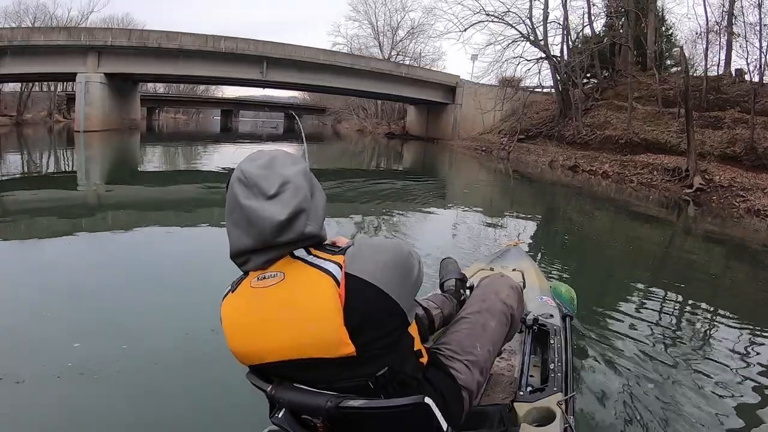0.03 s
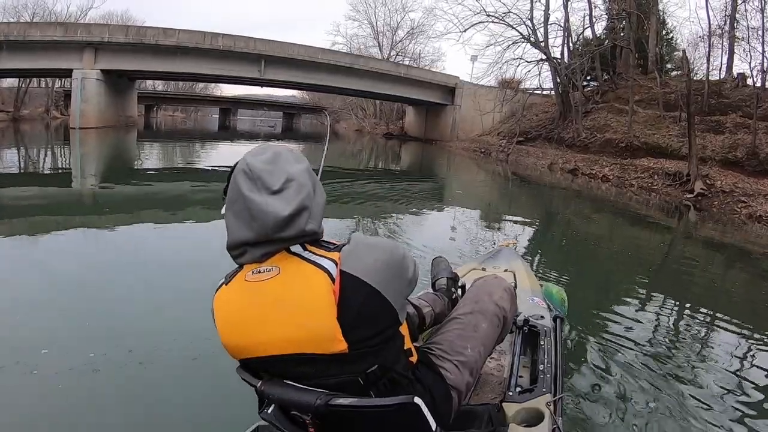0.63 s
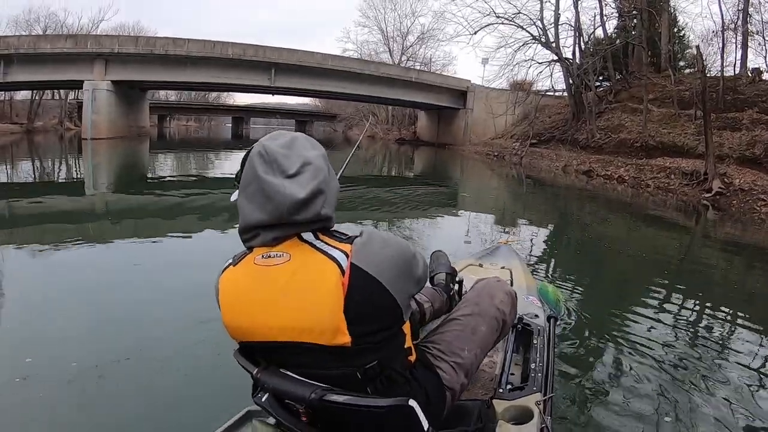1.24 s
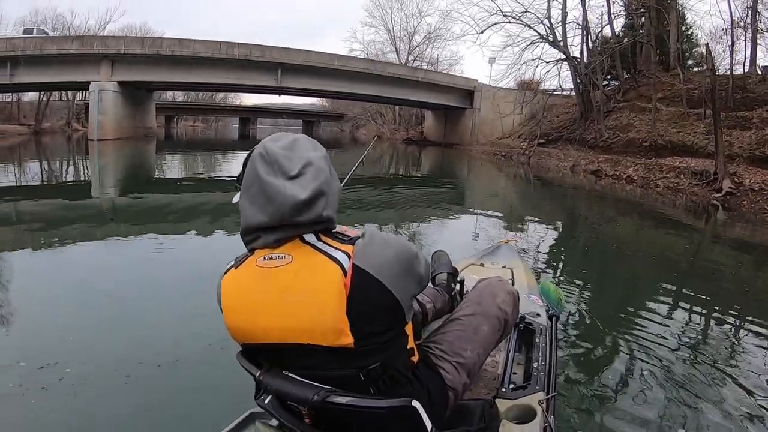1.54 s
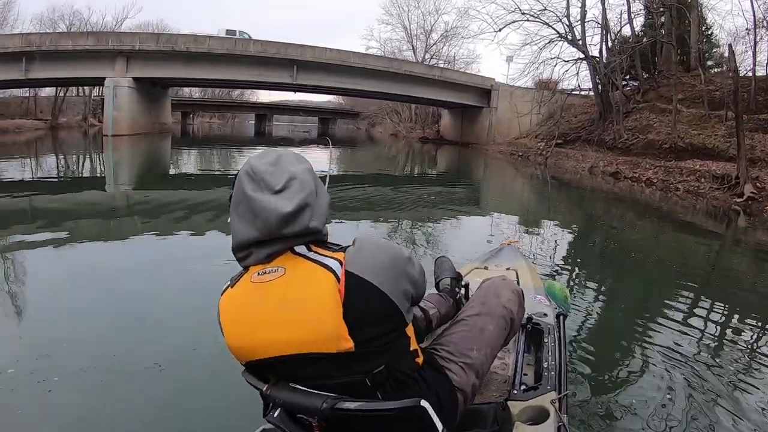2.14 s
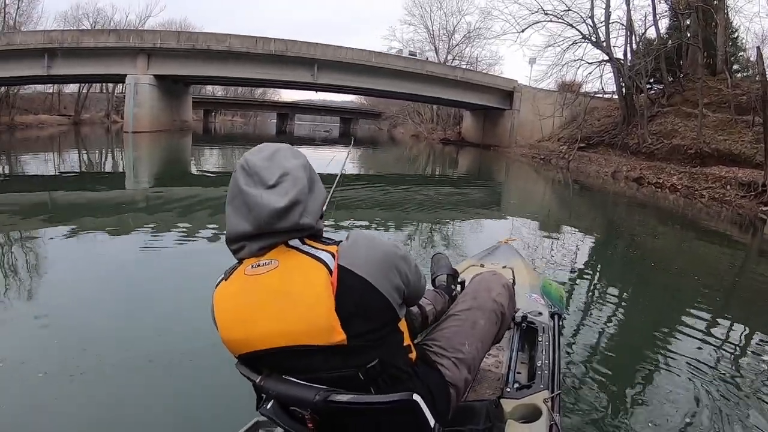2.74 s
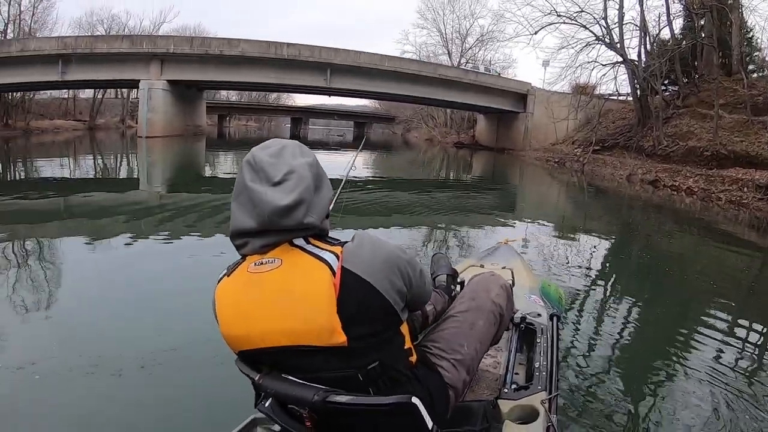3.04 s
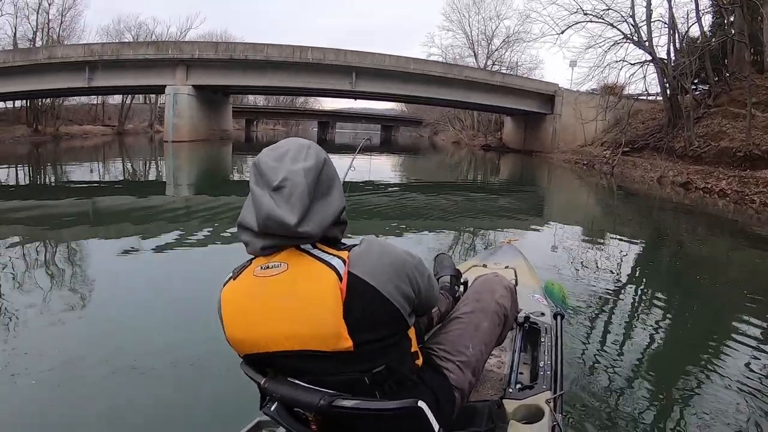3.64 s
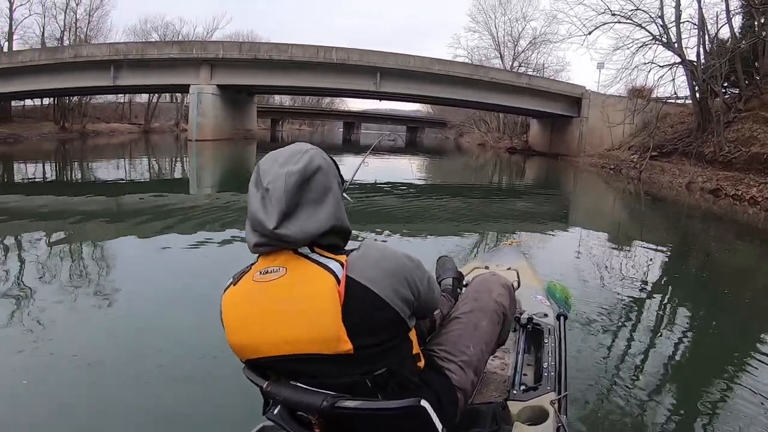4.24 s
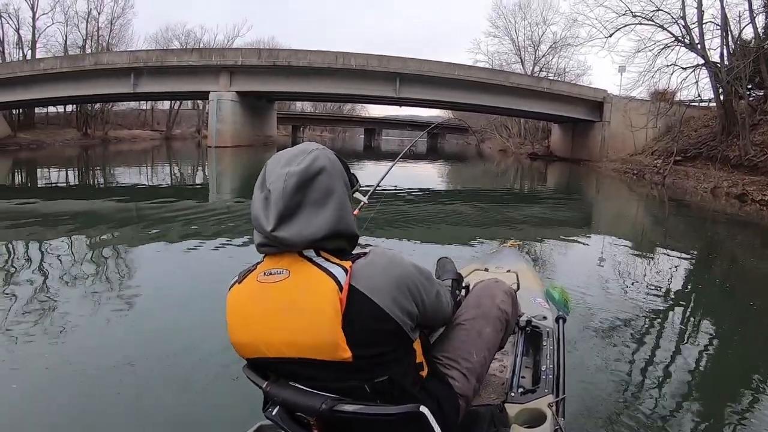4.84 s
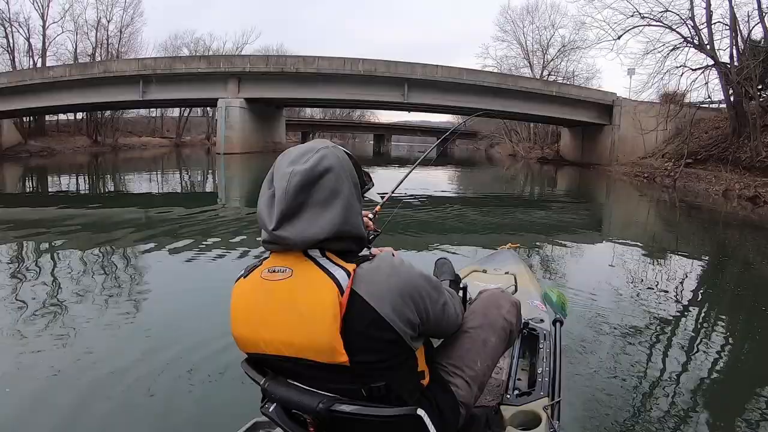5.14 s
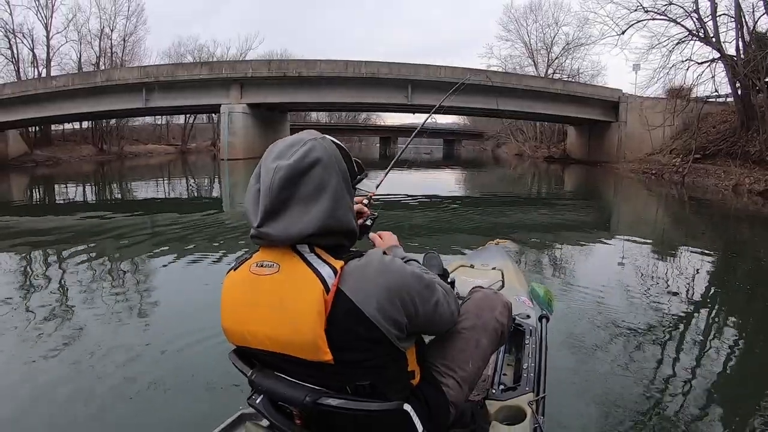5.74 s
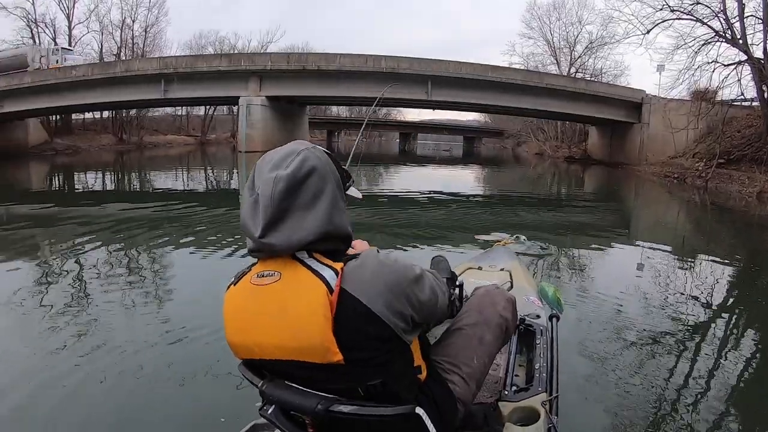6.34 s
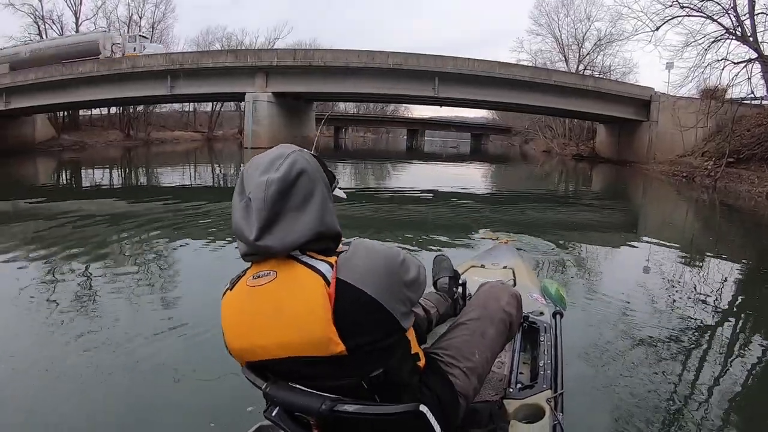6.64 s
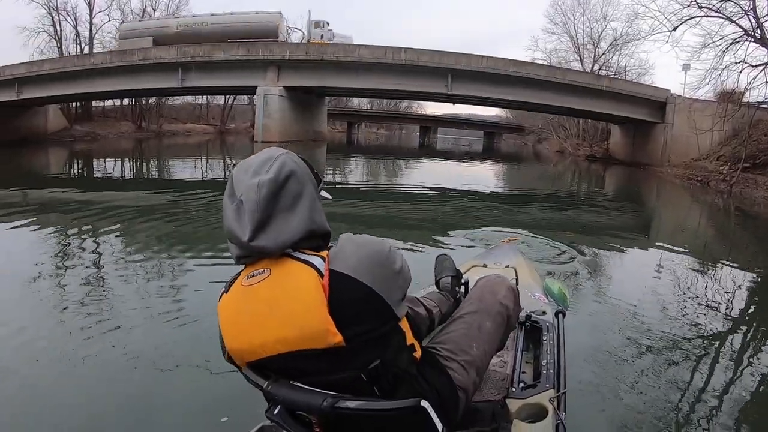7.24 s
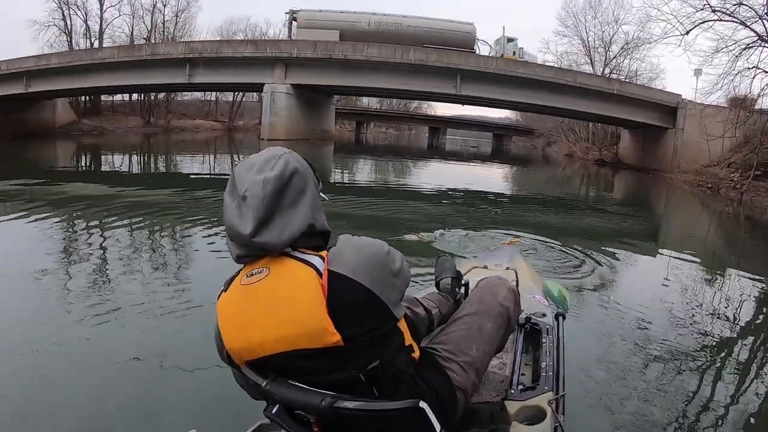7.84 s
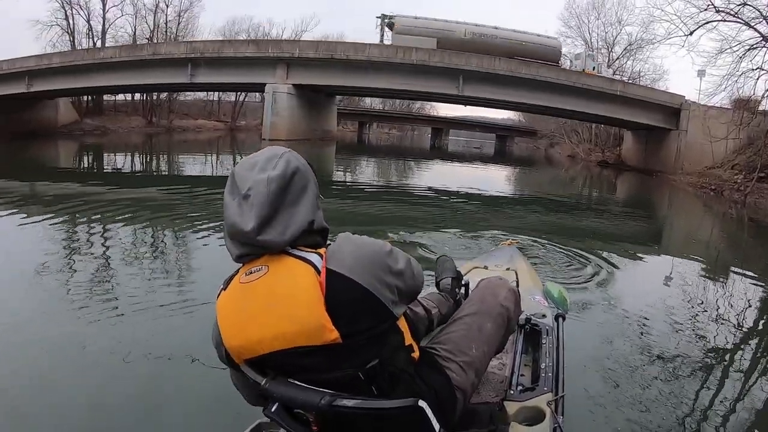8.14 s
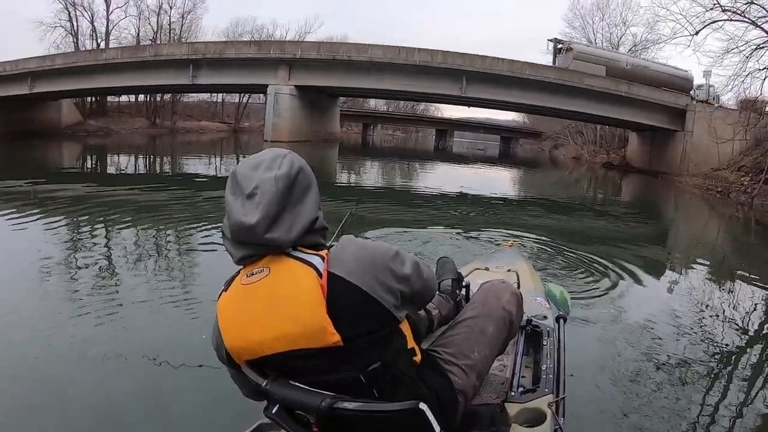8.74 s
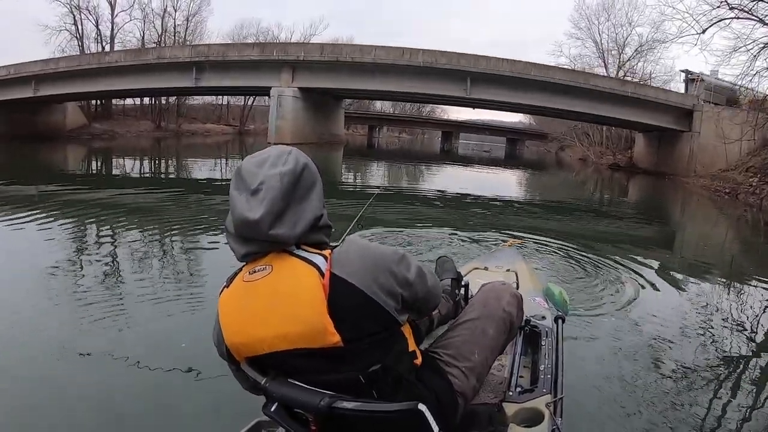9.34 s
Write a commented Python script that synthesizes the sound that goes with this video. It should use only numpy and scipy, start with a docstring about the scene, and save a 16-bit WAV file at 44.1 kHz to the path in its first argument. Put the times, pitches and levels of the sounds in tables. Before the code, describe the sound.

Traffic rumbles over a concrete bridge, heard from the river below, as a pickup passes and then a louder diesel tanker truck.

```python
"""A concrete road bridge rumbles with traffic, heard from a kayak on the river below.
A pickup crosses first, left to right. Then a tanker truck drones up, its diesel booming with each
firing, eases off with its turbo whistling down, and rolls over on singing tyres, trailer rattling.
Axles shake the bridge deck, and the blocks of the tyre tread roar on the road.
Close by, one tap knocks on the plastic boat, and a fishing rod and reel tick faintly."""
import sys
import numpy as np
from scipy import signal
from scipy.fft import rfft, irfft, next_fast_len
from scipy.io import wavfile
from scipy.ndimage import map_coordinates

SR = 44100
rng = np.random.default_rng(int(sys.argv[2]) if len(sys.argv) > 2 else 0)


def digitize_waveform(pressure):
    """Quantize a signal to 16-bit integers and store it at the path in sys.argv[1].

    Rows of a 2-D input are taken as channels; values are limited to [-1, 1].
    """
    field = np.atleast_2d(pressure).T
    bounded = np.clip(field, -1, 1)
    quanta = np.round(bounded * 32767).astype(np.int16)
    wavfile.write(sys.argv[1], SR, quanta)


N = 418509
TIME = np.arange(N) / SR

# how each vehicle passes the boat: closest_at_s, speed_m_per_s, distance_m
PICKUP_PATH = (2.12, 26.5, 44)
TRUCK_PATH = (7.62, 25, 30)


def undb(db):
    """Turn decibels into a factor to multiply by."""
    return 10 ** (np.asarray(db) / 20)


def curves(table):
    """Join the rows of a timed table with straight lines, giving one curve per value column."""
    times, *columns = np.transpose(table)
    return [np.interp(TIME, times, column) for column in columns]


def unit(x):
    """Scale a signal to an average strength (rms) of 1."""
    return x / np.sqrt(np.mean(x ** 2))


def bump(at_s, half_s):
    """A smooth rise to 1 and back."""
    return np.exp(-((TIME - at_s) / half_s) ** 2)


def bumps(table):
    """One smooth rise and fall for each row, added up."""
    return sum(undb(db) * bump(at_s, half_s) for at_s, half_s, db in table)


def swell(shape):
    """A level in dB that rises to 0, holds and falls."""
    start, end, rise, fall = shape
    return -rise * np.maximum(start - TIME, 0) - fall * np.maximum(TIME - end, 0)


def wander(rate_hz):
    """A smooth random drift, typically about 1 either side of zero."""
    steps = rng.standard_normal(int(N / SR * rate_hz) + 4)
    coarse = TIME[::32]
    return np.interp(TIME, coarse, map_coordinates(steps, [coarse * rate_hz + 1], order=3))


def colour(x, points):
    """Make each pitch louder or softer, following (pitch_hz, level_db) points."""
    size = next_fast_len(N)
    hz, db = np.transpose(points)
    freq = np.maximum(np.arange(size // 2 + 1) * SR / size, 1)
    gain = undb(np.interp(np.log(freq), np.log(hz), db))
    return irfft(rfft(x, size) * gain, size)[:N]


def noise(tone):
    """Noise shaped by (pitch_hz, level_db) points, dying away an octave beyond each end."""
    (low, low_db), (high, high_db) = tone[0], tone[-1]
    closed = [(low / 2, low_db - 60), *tone, (high * 2, high_db - 60)]
    return unit(colour(rng.standard_normal(N), closed))


def spread(direct, scattered, hidden_db=1.5, pickup_db=-4.5, truck_db=-6.5, lag_s=0.63, view_s=1.5):
    """Direct sound is alike in both ears; scattered sound is opposite, weaker with a vehicle in view."""
    # sound scattered between banks and water: pitch_hz, level_db
    width = [(60, -29), (150, -29), (250, -18), (400, -13), (600, -6.5), (1000, -0.5), (1400, -2),
             (2200, -1.5), (3200, -5.5), (6000, 2), (10000, 1.5)]
    pickup_view = bump(PICKUP_PATH[0] + lag_s, view_s)
    truck_view = bump(TRUCK_PATH[0] + lag_s, view_s)
    side = colour(scattered, width) * undb(hidden_db + pickup_db * pickup_view + truck_db * truck_view)
    return np.array([direct + side, direct - side])


def wash(tone, flutter_db):
    """Wide noise whose level flutters in the moving air."""
    return spread(noise(tone), noise(tone)) * undb(flutter_db * wander(11))


def phase_of(hz):
    """How far a wave of steady or moving pitch has turned, in radians."""
    return 2 * np.pi * np.cumsum(np.broadcast_to(hz, N)) / SR


def blurred(phase, width_hz):
    """A tone arriving by many changing paths, smeared into a narrow band."""
    return wander(width_hz) * np.cos(phase) + wander(width_hz) * np.sin(phase)


def band(hz, db, width_hz):
    """A smeared stereo tone that follows a pitch and a level."""
    phase = phase_of(hz)
    return spread(blurred(phase, width_hz), blurred(phase, width_hz)) * undb(db)


def passing(path):
    """A vehicle's distance (1 at its closest) and direction (-1 far left, 1 far right)."""
    closest_at_s, speed, distance = path
    along = speed * (TIME - closest_at_s)
    away = np.hypot(along, distance)
    return away / distance, along / away


def doppler(path, sound_m_per_s=343):
    """The Doppler effect: pitch is higher as a vehicle comes and lower as it goes."""
    _, direction = passing(path)
    return 1 / (1 + path[1] / sound_m_per_s * direction)


def traffic_direction(truck_weight=3):
    """Where the traffic seems to be, led by the nearer, louder vehicle."""
    pickup_away, pickup_at = passing(PICKUP_PATH)
    truck_away, truck_at = passing(TRUCK_PATH)
    weights = [1 / pickup_away ** 2, truck_weight / truck_away ** 2]
    return np.average([pickup_at, truck_at], axis=0, weights=weights)


def doppler_noise(channels, shift=.08):
    """Play a roar faster while the traffic comes and slower as it goes."""
    position = np.cumsum(1 - shift * traffic_direction())
    return np.array([map_coordinates(channel, [position], mode="mirror") for channel in channels])


def pan_traffic(traffic, pan_db=6.0):
    """Middle pitches follow the vehicles across the bridge; bass and high treble stay centred."""
    # how strongly each pitch follows: pitch_hz, level_db
    follows = [(300, -46.5), (500, -16.5), (700, 1), (950, 2.5), (3500, 0.5), (4500, -0.5), (5500, -27)]
    direction = traffic_direction()
    middle = np.array([colour(channel, follows) for channel in traffic])
    gains = undb(np.array([-direction, direction]) * pan_db / 2)
    return traffic + middle * (gains / gains.mean(axis=0) - 1)


def lean_right(channels, db):
    """Make the right side louder than the left."""
    return channels * undb(np.array([[-db], [db]]) / 2)


def ticking(table, tone, decay_s, attack_s=.0015, tail_db=-17, tail_s=.025):
    """One short burst of noise for each row, with a soft start and a faint tail."""
    bursts = 0
    for start_s, db in table:
        age = np.maximum(TIME - start_s, 0)
        fade = np.exp(-age / decay_s) + undb(tail_db) * np.exp(-age / tail_s)
        bursts = bursts + undb(db) * np.minimum(age / attack_s, 1) * fade
    return spread(noise(tone), noise(tone) * undb(-4)) * bursts


def fishing_line():
    """Line swishes onto the reel in tiny separate rubs."""
    # pulls of line: middle_s, half_length_s, level_db
    pulls = [(.07, 0.14, -79.5), (4.074, 0.06, -81), (4.493, 0.073, -79), (4.922, 0.14, -79.5),
             (5.244, 0.25, -77)]
    tone = [(6000, -12), (8000, -3), (9200, 0), (10200, -5), (12500, -17), (13500, -36)]
    swish = wash(tone, flutter_db=1)
    rubs = unit(undb(2.3 * wander(45) + 3.5 * wander(300)))
    return swish * bumps(pulls) * rubs


def tackle():
    """Rod and reel give small dry ticks and thin metal clicks, a little to the right."""
    # each tick and click: start_s, level_db
    ticks = [(0.915, -63), (1.269, -65), (1.292, -69), (1.827, -65.5), (4.015, -64), (4.139, -65),
             (4.149, -64), (4.433, -66), (4.872, -69), (4.939, -66), (5.317, -58), (5.329, -60),
             (6.167, -60), (6.341, -67), (6.481, -60), (6.555, -56), (6.658, -61)]
    clicks = [(1.295, -75), (1.83, -72), (2.0, -75), (3.535, -77), (4.148, -67), (4.62, -76), (5.435, -70),
              (6.06, -71), (6.115, -71)]
    # their tone: pitch_hz, level_db
    tick_tone = [(1000, -6), (3000, 4.5), (7000, 0), (9500, -12), (12000, -22)]
    click_tone = [(8500, -3), (10500, -6), (12500, -11.5), (14000, -4), (14800, -13)]
    both = ticking(ticks, tick_tone, decay_s=0.0083) + ticking(clicks, click_tone, decay_s=0.004)
    return lean_right(both, db=1.5)


def boat_knock(at_s=.916, knock_db=-22.0, attack_s=.003):
    """One soft tap gives a short hollow knock in the plastic boat."""
    # notes the boat rings at: pitch_hz, level_db, decay_s
    notes = [(545, -0.5, 0.0071), (432, -9, 0.0088)]
    age = np.maximum(TIME - at_s, 0)
    ring = sum(undb(db) * np.exp(-age / decay_s) * np.sin(2 * np.pi * hz * age)
               for hz, db, decay_s in notes)
    return undb(knock_db) * (1 - np.exp(-age / attack_s)) * ring


def earlier_car(start_db=-44, fade_db_per_s=7):
    """The tyre roar of a car that has already passed dies away."""
    return band(1060, start_db - fade_db_per_s * TIME, width_hz=400)


def shaking(column, idle_db, pickup_db, truck_db, jolt_s):
    """How hard the deck moves: a steady tremble, more under each vehicle, and a burst at each jolt."""
    # axles hitting the joints: middle_s, flex_db, rumble_db, ring_db
    jolts = [(.15, -43, -37.5, -53.5), (.55, -34, -28.5, -49), (.76, -27.5, -40.5, -43),
             (1.02, -45, -30.5, -51), (1.87, -28, -34.5, -38.5), (2.19, -35, -46, -51),
             (2.98, -40, -38, -52), (3.45, -32.5, -31, -41.5), (3.85, -44, -36.5, -52),
             (6.18, -29, -35, -37), (6.58, -25, -28, -36), (6.86, -22.5, -42, -40), (7.42, -30, -40, -32.5),
             (7.72, -32, -35, -31.5), (8.1, -32, -30.5, -32), (8.33, -26, -38, -53), (8.67, -31, -27, -53),
             (8.951, -25, -27, -21.5), (9.15, -23, -36.5, -60), (9.4, -35, -26.5, -26.5)]
    # weight on the deck: full_from_s, until_s, rise_db_per_s, fall_db_per_s
    pickup_load = (0, 4.5, 0, 12)
    truck_load = (5.87, 8.74, 41, 6.9)
    jolt_power = sum((undb(row[column]) * bump(row[0], jolt_s)) ** 2 for row in jolts)
    load_power = undb(pickup_db + swell(pickup_load)) ** 2 + undb(truck_db + swell(truck_load)) ** 2
    return np.sqrt(undb(idle_db) ** 2 + load_power + jolt_power)


def bridge_deck(ring_hz=180.2):
    """Axles shake the concrete: it flexes slowly, rumbles and rings with a low boom."""
    # tone of the flexing and the rumble: pitch_hz, level_db
    flex_tone = [(12, -12), (22, -3.5), (32, -5.5), (46, 2), (56, -7), (75, -33)]
    rumble_tone = [(45, -10), (60, 0), (100, 3.5), (135, -3.5), (180, -6.5), (225, -8.5), (280, -11.5),
                   (330, -19), (390, -21.5), (470, -30.5), (700, -48)]
    flex = wash(flex_tone, flutter_db=-0.5)
    flex *= shaking(column=1, idle_db=-44.5, pickup_db=-39.5, truck_db=-35.5, jolt_s=0.1)
    rumble = wash(rumble_tone, flutter_db=1)
    rumble *= shaking(column=2, idle_db=-34, pickup_db=-32.5, truck_db=-29.5, jolt_s=0.16)
    ring = band(ring_hz, 0, width_hz=53)
    ring *= shaking(column=3, idle_db=-54, pickup_db=-61.5, truck_db=-37.0, jolt_s=0.091)
    return flex + rumble + ring


def pickup_engine(pitch_hz=82.7, waver_db=1.5):
    """A light engine hums, its note sinking as it goes by."""
    # the pickup's exhaust: time_s, level_db
    exhaust = [(0, -29.5), (1.1, -31.5), (1.5, -52), (1.85, -27.5), (2.6, -29.5), (4.1, -33), (6, -54)]
    level_db = curves(exhaust)[0] + waver_db * wander(7)
    phase = phase_of(pitch_hz * doppler(PICKUP_PATH))
    note = np.sqrt(2) * np.cos(phase) + undb(-21.5) * blurred(3 * phase, width_hz=18)
    return note * undb(level_db)


def pickup_rush():
    """The pickup's tyres flare up as it comes onto the open bridge."""
    rush = band(hz=1380, db=-44, width_hz=520) + band(hz=700, db=-49, width_hz=140)
    return rush * bump(at_s=1.68, half_s=.33)


def rolling(levels, lag_s, end_on_db):
    """Strength of a tyre noise: loud on the open bridge, changed by end_on_db far along the road."""
    # time in the open: full_from_s, until_s, rise_db_per_s, fall_db_per_s
    pickup_open = (1.33, 3.16, 7.4, 5.6)
    truck_open = (7.25, 8.97, 5.3, 11.3)
    pickup_db, truck_db, far_db = levels
    vehicles = (PICKUP_PATH, pickup_open, pickup_db), (TRUCK_PATH, truck_open, truck_db)
    power = undb(far_db) ** 2
    for (closest_at_s, *motion), in_open, db in vehicles:
        _, direction = passing((closest_at_s + lag_s, *motion))
        power = power + undb(db + swell(in_open) + end_on_db * direction ** 2) ** 2
    return np.sqrt(power)


def tyre_noise(sizzle_db=-62.5):
    """Tread blocks roar, tyre walls drum, squeezed air hisses; the truck adds two hollow notes."""
    # tone of each noise: pitch_hz, level_db
    roar_tone = [(450, -15.5), (620, -2), (850, -0.5), (1000, 1), (1270, -1.5), (1500, -5), (2000, -11),
                 (2500, -17.5), (3500, -36.5)]
    drum_tone = [(250, -23.5), (390, -9.5), (460, 1), (620, -2), (750, -3.5), (950, -9.5), (1400, -31)]
    hiss_tone = [(1600, -11), (2100, 3), (3000, 4), (3600, -3.5), (4300, -11.5), (5000, -14.5),
                 (6500, -15.5), (7700, -21.5), (8600, -28), (10000, -33.5), (14000, -59.5)]
    sizzle_tone = [(2900, -9), (3700, 8.5), (4300, 6), (5000, 1.5), (6500, 1), (7700, -4.5),
                   (8700, -12.5), (10500, -25)]
    # who makes how much: pickup_db, truck_db, far_traffic_db
    roar_levels = (-41, -39, -51.5)
    drum_levels = (-53, -34.5, -49.5)
    hiss_levels = (-59.5, -48.5, -62)
    # sizzle as the truck passes: full_from_s, until_s, rise_db_per_s, fall_db_per_s
    sizzle_swell = (6.63, 8, 4.8, 13)
    # the hollow notes: time_s, low_hz, low_db, high_hz, high_db
    hollow_notes = [(5.8, 800.6, -74.5, 1150, -65), (6.15, 777.6, -66, 1122, -51.5),
                    (6.55, 724, -62, 1147, -46), (7.05, 646, -54, 1200, -47), (7.35, 570, -48, 1220, -43.5),
                    (7.72, 489.9, -37.5, 1149, -39.5), (8.05, 501.7, -41, 1233, -44.5),
                    (8.33, 625.6, -43, 1328, -41), (8.55, 728.7, -39, 1405, -45),
                    (8.8, 831, -36.5, 1513, -50), (9.05, 975, -58, 1560, -61)]
    roar = doppler_noise(wash(roar_tone, flutter_db=0.2))
    roar *= rolling(roar_levels, lag_s=.2, end_on_db=1.7)
    drum = wash(drum_tone, flutter_db=1.5) * rolling(drum_levels, lag_s=0.38, end_on_db=-13.5)
    hiss = wash(hiss_tone, flutter_db=1.1) * rolling(hiss_levels, lag_s=0.36, end_on_db=-8.0)
    sizzle = wash(sizzle_tone, flutter_db=0.1) * undb(sizzle_db + swell(sizzle_swell))
    low_hz, low_db, high_hz, high_db = curves(hollow_notes)
    low_note = band(low_hz, low_db, width_hz=240) + band(low_hz, low_db - 4, width_hz=480)
    high_note = band(high_hz, high_db, width_hz=320)
    return roar + drum + hiss + sizzle + low_note + high_note


def tyre_song(tread_hz=705, far_hum_db=-55):
    """Evenly spaced tread blocks sing; the road shakes the pitch and the wheels never quite agree."""
    # the truck's tyres: time_s, level_db
    truck_song = [(5.5, -67.5), (6.06, -55), (6.16, -43), (6.26, -40), (6.34, -50), (6.56, -37.5),
                  (6.9, -40.5), (7.09, -44), (7.25, -37), (7.55, -42), (7.85, -51), (8.2, -42.5),
                  (8.48, -36.5), (8.85, -37), (9.1, -38.5), (9.49, -37.5)]
    # the pickup's tyres: time_s, pitch_hz, level_db
    pickup_song = [(0, 1274, -60), (.72, 1255, -60), (.95, 1250, -48), (1.25, 1250, -49), (1.7, 1248, -44),
                   (2.0, 1245, -48), (2.38, 1215, -42), (2.7, 1207, -57), (3.15, 1139, -46.5),
                   (3.55, 1130, -50), (4.5, 1120, -84)]
    hz = tread_hz * doppler(TRUCK_PATH)
    db, = curves(truck_song)
    shaken_phase = phase_of(hz * (1 + .008 * wander(18))) + .45 * wander(110)
    whine = np.cos(shaken_phase) * undb(db - 2 + 1.5 * wander(16))
    roughness = band(hz, db - 9, width_hz=55) + band(hz, db - 7, width_hz=130)
    hum = band(hz / 2, np.maximum(db - 5, far_hum_db), width_hz=45)
    return whine + roughness + hum + band(*curves(pickup_song), width_hz=70)


def trailer_rush(level_db=-48.0):
    """The last axles add a bright rush as they come into view."""
    tone = [(1200, -13), (1450, -3.5), (1700, -4.5), (1930, 1.5), (2250, 0), (2600, -10.5)]
    return wash(tone, flutter_db=1.5) * bump(at_s=8.32, half_s=0.6) * undb(level_db)


def trailer_rattle(rough_db=4.0, steel_db=-4, chatter_db=-56):
    """The trailer rattles in short bursts over a softer chatter; both make its loose steel ring."""
    # the bursts: middle_s, half_length_s, level_db
    rattles = [(7.25, 0.016, -48), (7.328, 0.011, -45), (7.387, 0.026, -50), (7.434, 0.016, -47),
               (7.475, 0.014, -49), (7.532, 0.015, -46), (7.644, 0.025, -56), (7.815, 0.012, -52),
               (7.86, 0.014, -53), (7.935, 0.014, -55), (8.017, 0.01204, -52), (8.12, 0.014, -52),
               (8.278, 0.018, -52), (8.375, 0.02, -51), (8.55, 0.025, -55.5)]
    # notes of the loose steel: pitch_hz, level_db
    steel = [(2330, -5), (2720, -3.5), (3130, -0.5), (3340, -5), (3680, -7.5)]
    bursts = bumps(rattles) * undb(rough_db * wander(120))
    jiggle = unit(undb(5 * wander(70)))
    chatter = undb(chatter_db) * bump(at_s=8.0, half_s=.65) * jiggle
    half_doppler = doppler(TRUCK_PATH) ** .5
    ring = unit(sum(band(hz * half_doppler, db, width_hz=130) for hz, db in steel))
    scrape_tone = [(2000, -6), (2600, -3), (3200, 0), (3700, 3), (4000, -3), (4400, -11)]
    scrape = wash(scrape_tone, flutter_db=0.5)
    return (scrape + ring * undb(steel_db)) * bursts / np.sqrt(2) + ring * chatter


def turbo(hiss_db=-68):
    """The engine's air pump spins down as the driver eases off: two falling whistles wrapped in hiss."""
    # the shaft's thin whistle: time_s, pitch_hz, level_db
    shaft_whistle = [(5.6, 6000, -98), (5.95, 5950, -85), (6.35, 5400, -80), (6.78, 4770, -76),
                     (6.92, 4590, -64), (7.08, 4395, -58), (7.16, 4293, -60), (7.19, 4240, -68),
                     (7.33, 4015, -60), (7.48, 3830, -66), (7.66, 3660, -56), (7.8, 3530, -66),
                     (8.2, 3280, -59), (8.7, 3080, -64), (9.2, 3000, -95)]
    # the upper whistle: time_s, pitch_hz, core_db, breath_db
    upper_whistle = [(6.2, 7300, -130, -115), (6.5, 7000, -100, -82), (6.94, 6350, -82, -68),
                     (7.02, 6280, -67, -59), (7.16, 6120, -66, -58), (7.24, 5920, -60, -59),
                     (7.32, 5760, -55, -59), (7.39, 5630, -65, -58), (7.45, 5530, -60, -57.5),
                     (7.6, 5360, -71, -62), (7.8, 5190, -71, -66), (7.95, 4870, -68, -69),
                     (8.25, 4590, -66.5, -68), (8.7, 4370, -86, -84), (9.2, 4260, -110, -100)]
    hz, db = curves(shaft_whistle)
    shaft = np.sqrt(2) * np.cos(phase_of(hz * (1 + .002 * wander(70)))) * undb(db - 2)
    shaft = shaft + band(hz, db - 7, width_hz=260)
    upper_hz, core_db, breath_db = curves(upper_whistle)
    core = np.cos(phase_of(upper_hz * (1 + .006 * wander(120)))) * undb(core_db - 1)
    core = core + band(upper_hz, core_db - 3, width_hz=220)
    breath = band(upper_hz, breath_db - 2.5, width_hz=1050)
    hiss_tone = [(4000, -13.5), (5000, -2.5), (6000, 4), (7000, -1.5), (7800, -6), (8500, -19.5)]
    hiss = wash(hiss_tone, flutter_db=2.5) * bump(at_s=7.35, half_s=.85) * undb(hiss_db)
    return shaft + core + breath + hiss


def fluttering_hiss(phase, pulsing=0.4):
    """A high hiss swells twice as the truck approaches, fluttering at the engine's firing rate."""
    # the two swells: middle_s, half_length_s, level_db
    swells = [(4.199, 0.8, -64), (5.504, 0.56, -58.5)]
    # tone of the hiss: pitch_hz, level_db
    tone = [(1600, -9.5), (2100, 1.5), (3000, 9), (3600, -1.5), (4500, -9), (6500, -13.5), (8500, -19),
            (10000, -24.5), (13000, -44.5)]
    return wash(tone, flutter_db=-0.5) * (1 + pulsing * np.cos(phase)) * bumps(swells)


def diesel(waver_db=1.4, waver_hz=5):
    """The truck's firings boom, each overtone swells and fades with the echoes, and exhaust gas rasps."""
    # how fast the engine fires, before the Doppler effect: time_s, rate_hz
    firing = [(0, 63.7), (1, 62.9), (3, 62.5), (4.3, 62.7), (5.1, 62.3), (6, 62.5), (6.8, 62), (7.7, 62.6),
              (8.5, 63.5), (9.49, 64)]
    # the firing note and the octave above it: time_s, boom_db, bark_db
    exhaust = [(0, -29.5, -44.5), (1.3, -32, -52.5), (1.9, -23.5, -34.5), (2.4, -37, -47), (3.25, -30, -49),
               (3.85, -26.5, -46), (4.25, -20, -32), (4.7, -16, -29), (5.05, -16.5, -35),
               (5.35, -19, -27.5), (5.58, -15.5, -45.5), (6, -16, -30.5), (6.4, -23.5, -39.5),
               (7.06, -20, -39), (7.3, -37.5, -32), (7.7, -22.5, -30.5), (8.2, -34.5, -31),
               (9.49, -24.5, -39)]
    # growl as the engine works: time_s, level_db
    growl_level = [(0, -46), (4.2, -47), (4.45, -35.5), (4.85, -36.5), (5.4, -33), (5.9, -40.5), (7, -55),
                   (7.6, -35), (8.6, -46)]
    # higher notes in the growl: multiple_of_firing_rate, level_db
    overtones = [(1.5, -10), (2.4, -9.5), (3, -1), (4, -13), (4.25, -10.5), (4.599, -14.5), (5, -14),
                 (5.65, -13), (6, -16.5)]
    # tone of the exhaust gas: pitch_hz, level_db
    gas_tone = [(250, -12.5), (330, -2.5), (420, 3), (520, -3.5), (650, -18), (1000, -21)]
    hz = curves(firing)[0] * doppler(TRUCK_PATH)
    boom_db, bark_db = curves(exhaust)
    growl_db, = curves(growl_level)
    phase = phase_of(hz * (1 + .002 * wander(12)))
    boom = np.sqrt(2) * np.cos(phase) * undb(boom_db)
    bark = (np.sqrt(2) * np.cos(2 * phase) + 0.19 * blurred(2 * phase, width_hz=14)) * undb(bark_db)
    uneven_phase = phase + .085 * wander(35)
    growl = 0
    for multiple, db in overtones:
        gain = undb(db + waver_db * wander(waver_hz))
        note = 1.2 * np.cos(multiple * uneven_phase) + .58 * blurred(multiple * phase, width_hz=32)
        growl = growl + gain * note
    rasp = wash(gas_tone, flutter_db=-0.5) * (1 + 0.5 * np.cos(phase)) * undb(-14)
    return boom + bark + (growl + rasp) * undb(growl_db) + fluttering_hiss(phase)


def scene():
    """Everything on the bridge, leaning slightly right, and the small sounds of the boat."""
    traffic = diesel() + turbo() + pickup_engine() + pickup_rush() + bridge_deck()
    traffic = traffic + tyre_noise() + earlier_car() + tyre_song() + trailer_rush() + trailer_rattle()
    return lean_right(pan_traffic(traffic), db=0.62) + tackle() + fishing_line() + boat_knock()


def record(dry, fade_s=.004, top_hz=15000):
    """The sound fades in quickly, and the highest treble is cut away."""
    fade = np.minimum(TIME / fade_s, 1)
    treble_cut = signal.ellip(8, .1, 70, top_hz, fs=SR, output="sos")
    return signal.sosfilt(treble_cut, dry * fade)


dry = scene()
out = record(dry)
digitize_waveform(out)
```